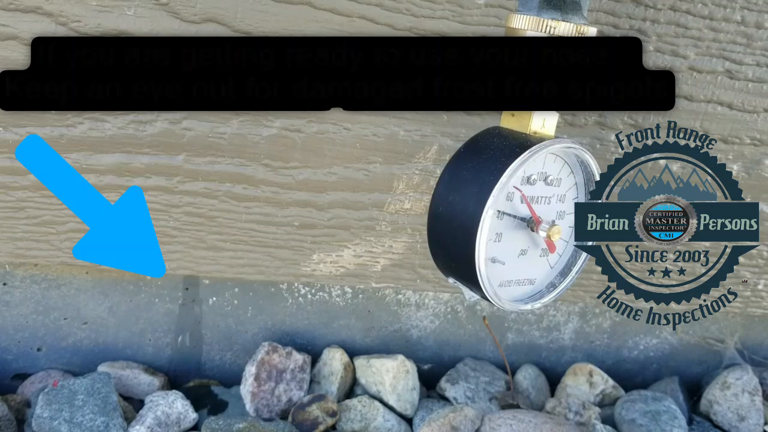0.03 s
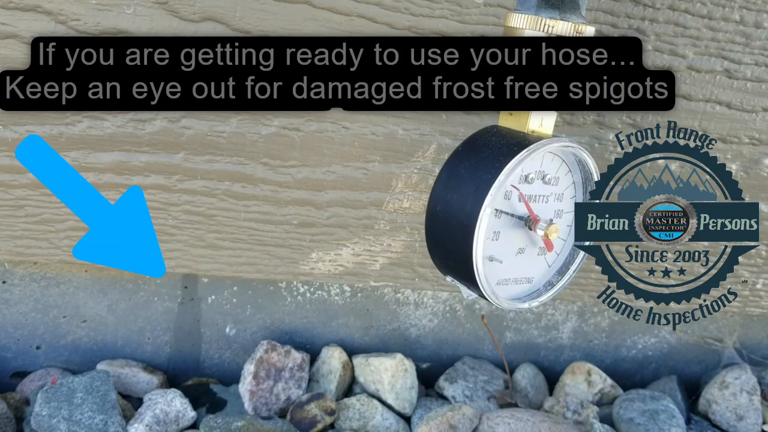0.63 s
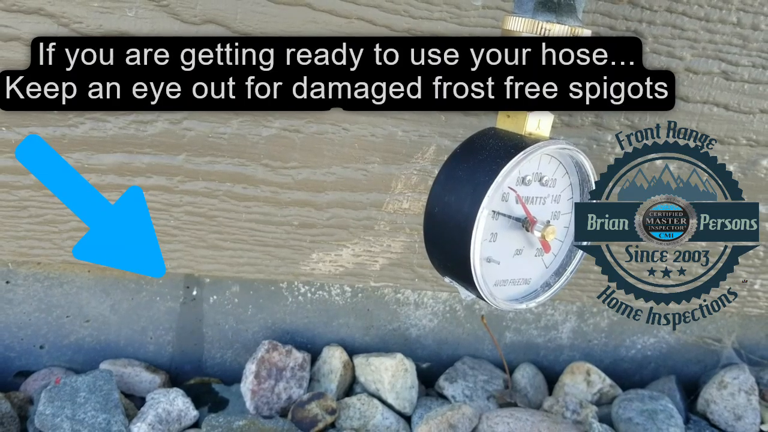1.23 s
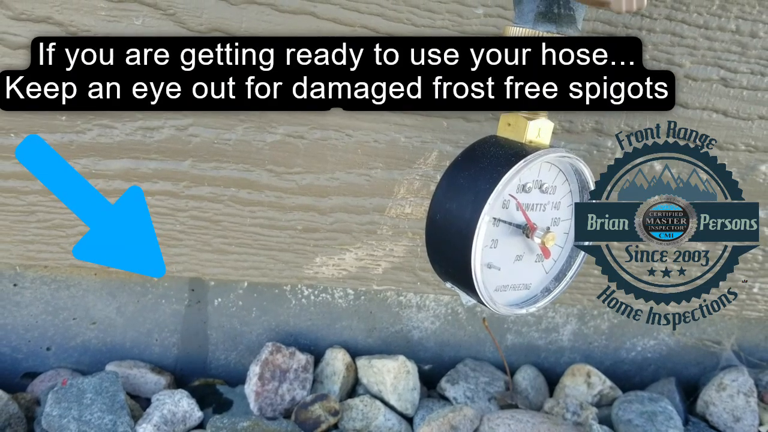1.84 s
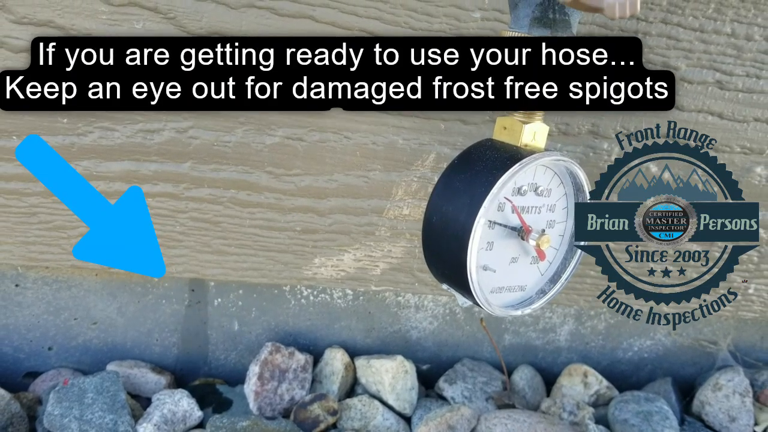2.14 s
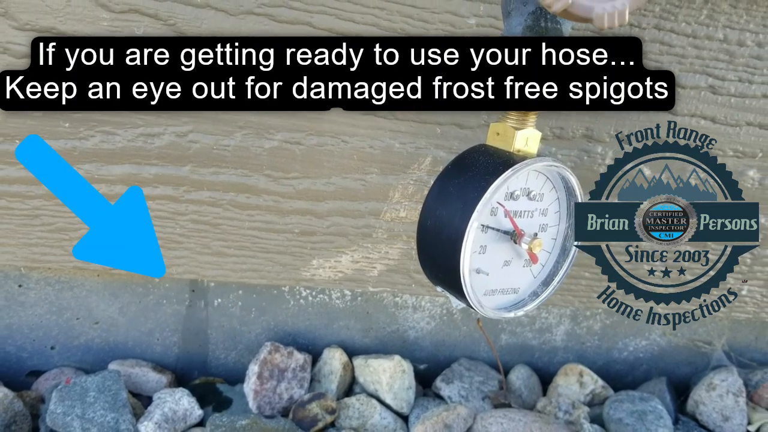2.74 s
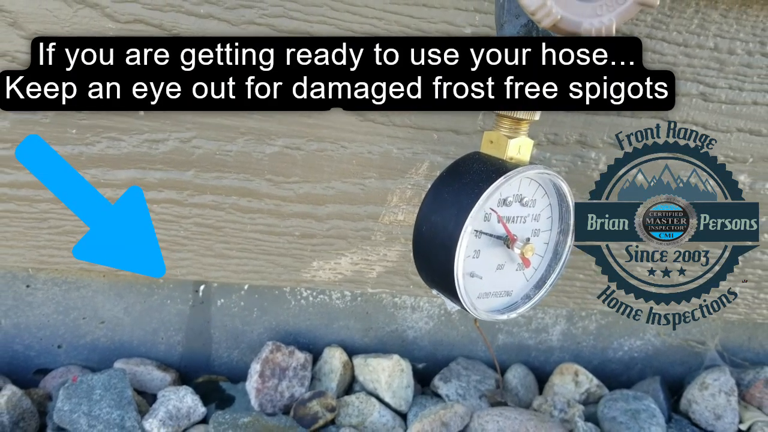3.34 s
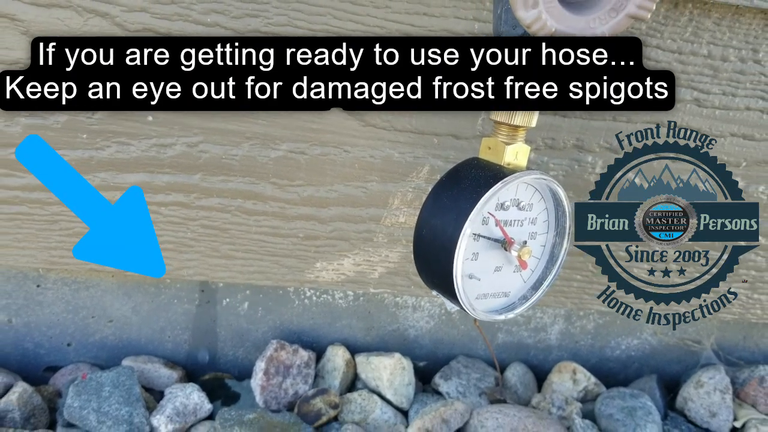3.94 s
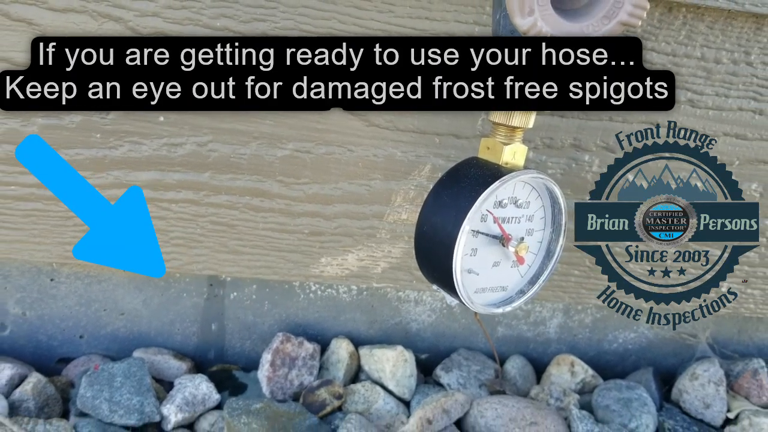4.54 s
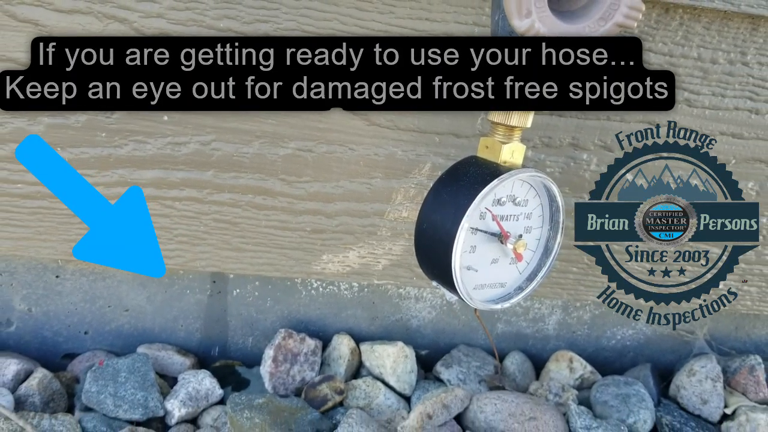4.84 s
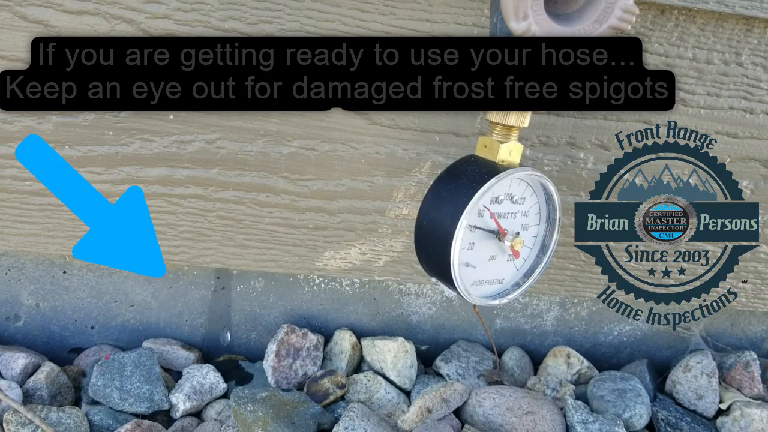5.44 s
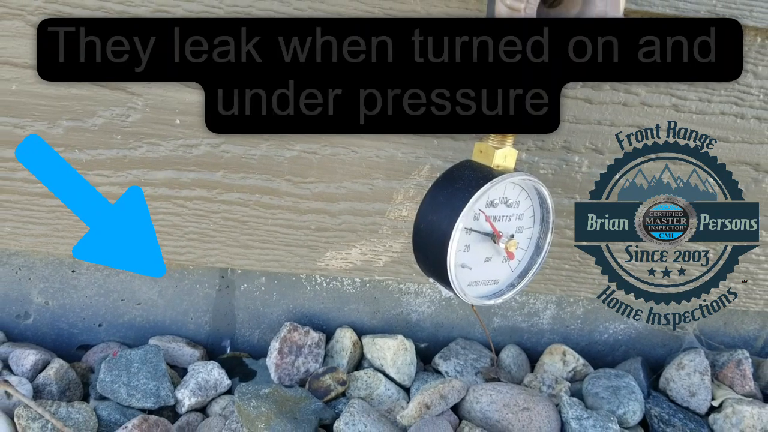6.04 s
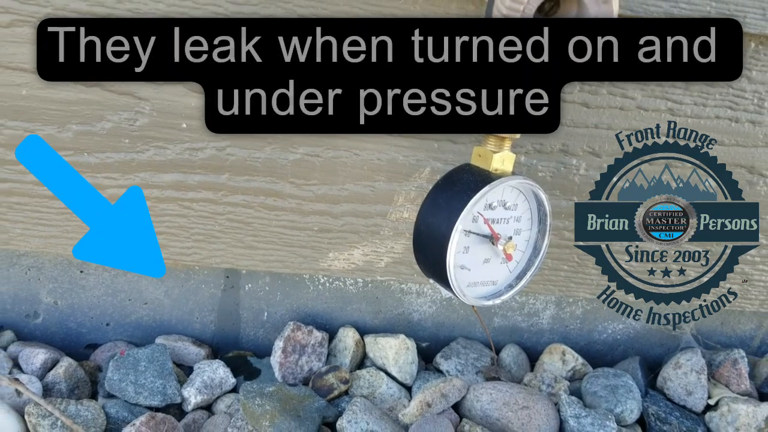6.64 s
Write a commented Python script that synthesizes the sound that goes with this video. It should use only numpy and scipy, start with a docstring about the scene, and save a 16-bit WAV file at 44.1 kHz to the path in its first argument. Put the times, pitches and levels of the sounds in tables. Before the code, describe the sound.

From about 0.2 seconds, pressurized water sprays from a cracked outdoor spigot close to the microphone. It makes a bright, fluttering hiss, leaning left, mixed with dense, fine spatter on a wall and stones. Underneath, water runs softly among pebbles and the pipe holds a faint hollow note. Tiny sharp spits dot the first second, with a spurt near 0.8 seconds. The flow chokes and spurts again around 1.3, dips briefly at 3, and surges near 4.7, 5.3, 5.5 and 6.5. After 4 seconds the hiss shifts slightly toward the middle and brightens a little. A light breeze rumbles on the microphone over a dull, distant neighbourhood rumble. A thin, very high whistle flutters with the gusts, strongest around 1 second, and the spray has a glassy, fizzy edge. The leak continues until the end, at about 6.7 seconds.

```python
"""Split spigot against a house wall

Outdoors, close to the leak: water under pressure tears out of the crack, hissing and fluttering on the left.
Droplets patter on the wall, water runs among the pebbles below and the pipe rings faintly. Air rumbles on
the microphone, with the neighbourhood far behind. The recorder's low, unsmoothed sample rate mirrors it
all into the treble, where the rumble becomes a fluttering whistle."""
import sys
import numpy as np
from scipy import signal
from scipy.fft import rfft, irfft
from scipy.io import wavfile
from scipy.ndimage import uniform_filter1d

SR = 44100
rng = np.random.default_rng(int(sys.argv[2]) if len(sys.argv) > 2 else 0)


def master_out(mix):
    """Clip the mix to full scale and print it as 16-bit PCM to the path in sys.argv[1]."""
    frames = np.transpose(np.atleast_2d(mix))
    ceiling = np.clip(frames, -1, 1)
    pcm = np.round(ceiling * 32767).astype(np.int16)
    wavfile.write(sys.argv[1], SR, pcm)


N = 294588
TIME = np.arange(N) / SR
FREQS = np.maximum(np.arange(N // 2 + 1) * SR / N, 1)
LEFT_MINUS_RIGHT = np.array([[1], [-1]])


# where the jet points, seen from the microphone: (time [s], relative lean to the left [dB])
JET_AIM = [(0.2, 8), (3.7, 8), (3.87, 7.5), (4.7, 5), (5.0, 4.5), (5.55, 4), (5.73, 6.2), (6.0, 5),
           (6.68, 5.5)]
# short sharp spits, in the jet alone: (time [s], lift [dB])
JET_SPITS = [(.19, 4), (.255, 6), (.298, 3), (.352, 4), (.398, 4), (.505, 6), (.637, 6), (2.012, 6),
             (3.30, 7.5), (3.56, 4), (3.69, 4.5), (3.795, 4), (5.136, 2.5)]
# resonances of the crack: (frequency [Hz], width [Hz], left [dB], right [dB])
CRACK_MODES = [(4040, 77, -4, -33), (4195, 33, 4, -10.5), (4400, 134, -18.5, -10), (4566, 34, -0.5, -12.5),
               (4715, 64, 1.5, -17.5), (4880, 30, -31, -36)]

def jet(flow_db, turn_db, gain_db=-54.0, pan_offset_db=-7.5, spit_half_s=0.0051):
    """Close by, a sheet of water tears up at the crack; the hiss weakens and brightens as it turns."""
    spits_db = sum(lift * bump(at, spit_half_s) for at, lift in JET_SPITS)
    strength_db = 0.7 * flow_db + spits_db - 0.19 * turn_db
    flutter_db = 0.24 * drift(12) + 0.85 * drift(70)
    tearing = droplets(per_s=3400, size_spread_db=1.0, mist_db=2.0) * from_db(strength_db + flutter_db)
    hiss = resonate(tearing, CRACK_MODES, tilt_db=0.94 * turn_db, wander_db=1.8)
    pan_db = in_time(JET_AIM) + pan_offset_db
    return from_db(gain_db + pan_db / 2 * LEFT_MINUS_RIGHT) * sheet_waver(hiss)


def sheet_waver(hiss, pitch_share=0.005, rate_hz=1.49):
    """All the jet's pitches sway together as the sheet of water changes shape."""
    read_s = TIME + pitch_share / (2 * np.pi * rate_hz) * drift(rate_hz)
    return np.array([np.interp(read_s, TIME, channel) for channel in hiss])


# strength of the leak about its usual flow: (time [s], level [dB])
LEAK_FLOW = [(0.2, 1.8), (1.13, 0.4), (1.34, -3.5), (1.49, 3.5), (2.27, 1.8), (2.43, -0.4), (2.71, 3),
             (2.87, 0), (3.47, 0.5), (3.84, 3), (3.96, 0), (4.38, 1.7), (4.6, -1.2), (4.89, 2.5),
             (5.05, -0.5), (5.75, -1.7), (6.68, 0.5)]
# the crack spurts harder for a moment: (start [s], length [s], lift [dB])
LEAK_SPURTS = [(0.763, 0.044, 5.5), (1.279, 0.076, 7.5), (1.985, 0.096, 3.0), (3.094, 0.089, 3),
               (3.63, 0.04, 3), (4.713, 0.09, 3), (5.12, 0.02, 3.6), (5.312, 0.098, 5.5),
               (5.469, 0.12, 4.5), (5.812, 0.02, 2), (6.545, 0.076, 4)]
# the leak chokes briefly: (time [s], level change [dB], half length [s])
LEAK_CHOKES = [(1.24, -5, 0.016), (3.03, -3.8, 0.03)]

def leak_flow_db(attack_s=0.01, release_s=0.027):
    """The flow at the spigot swells and sinks, shakes all the time, and now and then spurts or chokes."""
    flow_db = in_time(LEAK_FLOW) + 0.5 * drift(16)
    for start, length, lift in LEAK_SPURTS:
        rise = (TIME - start) / attack_s
        fall = 1 - (TIME - start - length) / release_s
        flow_db += lift * np.clip(np.minimum(rise, fall), 0, 1)
    return flow_db + sum(change * bump(at, half_s) for at, change, half_s in LEAK_CHOKES)


# resonances of wall and stones under the spray: (frequency [Hz], width [Hz], left [dB], right [dB])
WALL_AND_STONE_MODES = [(1353, 160, -8, -12), (1608, 28, -8.5, -6.5), (1751, 36, -2, -4.5),
                        (1908, 230, -8, -7.5), (2190, 17, -9, -4.5), (2459, 21, -6, 1),
                        (2568, 19, -1.5, -3.5), (2777, 133, -3.5, -2), (3021, 45, -3.5, -12),
                        (3129, 33, -10, 1.5), (3386, 22, -6, -2.5), (3607, 67, -5.5, -5.5),
                        (3844, 130, -17, -4.5)]

def splash(flow_db, turn_db, gain_db=-54.0):
    """Droplets land in clumps on the wall and stones by the spigot, brighter as the jet turns inward."""
    clumps = from_db(1.18 * flow_db + 0.5 * drift(4.5) + drift(130))
    impacts = droplets(per_s=3000, size_spread_db=1.0, mist_db=-1.0) * clumps
    patter = resonate(impacts, WALL_AND_STONE_MODES, tilt_db=0.75 * turn_db, wander_db=1.95)
    return from_db(gain_db) * patter


# where the wall's echo meets the direct sound: (frequency [Hz], width [Hz], gain [dB])
WALL_ECHO_BANDS = [(1450, 63, 0.5), (2140, 70, -12), (2340, 34, -9), (3480, 70, -3.5)]

def wall_echo(spray):
    """At the microphone the echo off the wall cancels a few narrow bands and barely lifts one."""
    for hz, width, gain_db in WALL_ECHO_BANDS:
        band = signal.lfilter(*signal.iirpeak(hz, hz / width, fs=SR), spray)
        spray = spray + (from_db(gain_db) - 1) * band
    return spray


# water running on the ground below the spigot: (time [s], relative level [dB])
PEBBLE_LEVEL = [(0.2, -57), (1.1, -57), (1.6, -55.5), (2.7, -58), (4.2, -58.5), (5.7, -59), (6.4, -56),
                (6.68, -56.5)]
# hollows between the pebbles: (frequency [Hz], width [Hz], left [dB], right [dB])
PEBBLE_MODES = [(365, 106, -9.5, -15), (554, 108, -5, 1), (688, 33, 3.1, 0), (835, 140, -7, -6.5),
                (1027, 110, -19, -27)]

def pebble_rush(gain_db=-1.5):
    """At the foot of the wall, water pours among the pebbles, lower and steadier than the splash."""
    trickle = droplets(per_s=2500, size_spread_db=2.5, mist_db=-2.5) * from_db(1.54 * drift(18))
    return from_db(in_time(PEBBLE_LEVEL) + gain_db) * resonate(trickle, PEBBLE_MODES)


# the pipe's note at the usual flow: (time [s], relative level [dB])
PIPE_LEVEL = [(0.2, -60.5), (1.6, -56.5), (2.4, -60), (3.7, -56.5), (4.0, -59), (4.25, -57), (5.4, -55),
              (5.85, -57), (6.68, -59.5)]
# resonance of the pipe: (frequency [Hz], width [Hz], left [dB], right [dB])
PIPE_RESONANCE = [(1227.3, 27, -3.5, -2)]

def pipe_ring(flow_db, gain_db=-2.3):
    """Behind the crack, turbulence inside the spigot keeps one hollow note ringing."""
    level_db = in_time(PIPE_LEVEL) + gain_db + 0.62 * flow_db + 0.8 * drift(5.1)
    turbulence = microphone_pair(rng.standard_normal((2, N)))
    return from_db(level_db) * resonate(turbulence, PIPE_RESONANCE)


# gusts at the microphone: (time [s], relative level [dB])
BREEZE_LEVEL = [(0.2, -65), (0.36, -50.5), (0.72, -55), (0.98, -43.5), (1.2, -60.5), (1.45, -52),
                (3.0, -54), (3.2, -47.8), (3.45, -56.5), (4.35, -56.5), (4.54, -48.5), (4.68, -60.5),
                (4.92, -49), (5.6, -56), (5.75, -53), (6.68, -53)]
# spectrum of the air moving over it: (frequency [Hz], relative level [dB])
BREEZE_SPECTRUM = [(5, -29), (12, -9), (19, 2.5), (28, -5.5), (43, -18), (74, -26), (150, -43), (400, -70)]

def breeze(gain_db=-1.7, evenness=0.86):
    """Air rocks the microphone itself some twenty times a second; gusts set its strength."""
    sway = coloured_noise(BREEZE_SPECTRUM)
    local_power = uniform_filter1d(np.mean(sway ** 2, axis=0), size=SR // 12) + 1e-6
    even_sway = sway / local_power ** (evenness / 2)
    return from_db(in_time(BREEZE_LEVEL) + gain_db) * even_sway


# the neighbourhood in the distance: (time [s], relative level [dB])
RUMBLE_LEVEL = [(0.2, -63.2), (0.8, -71.5), (1.0, -64), (1.9, -59.5), (2.8, -67), (3.1, -64.5),
                (3.8, -65.5), (5.1, -63), (5.6, -66.5), (6.5, -62)]
# spectrum of its rumble: (frequency [Hz], relative level [dB])
RUMBLE_SPECTRUM = [(25, -16.5), (50, -1), (74, 1), (95, -9.5), (120, -6), (148, -1.5), (195, -31.5),
                   (300, -19.5), (600, -46)]

def far_rumble(gain_db=-1.0):
    """The neighbourhood reaches the microphone from far off as a dull rumble."""
    return from_db(in_time(RUMBLE_LEVEL) + gain_db) * coloured_noise(RUMBLE_SPECTRUM)


# between the two microphone ports: (frequency [Hz], coherence [0-1], phase lead of the left [rad])
MICROPHONE_PORTS = [(30.4, 0.97, -0.06), (156, 0.66, -1.24), (295, 0.3, -0.5), (574, 0.43, -0.85),
                    (704, 0.48, 0.1), (880, 0.35, 2), (1210, 0.59, 4.0), (1600, 0.26, 2.5), (2300, 0.08, 4),
                    (3040, 0.17, 3), (3750, 0, 5), (4226, 0.4, 7.5), (4580, 0, 10), (4860, 0.32, 10)]

def microphone_pair(unrelated):
    """Two unrelated signals become left and right; paths along the wall turn the phase between them."""
    coherence, lead = over_hz(MICROPHONE_PORTS)
    mid, side = rfft(unrelated)
    channels = np.sqrt(1 + coherence) * mid + np.sqrt(1 - coherence) * side * LEFT_MINUS_RIGHT
    return irfft(channels * np.exp(0.5j * lead * LEFT_MINUS_RIGHT), N)


def droplets(per_s, size_spread_db, mist_db):
    """Random impacts, many small and a few large, over the smooth hiss of fine mist."""
    sizes = from_db(size_spread_db * np.minimum(rng.exponential(1, (2, N)), 5))
    lands = rng.random((2, N)) < per_s / SR
    hits = lands * sizes * rng.choice([-1, 1], (2, N))
    mist = from_db(mist_db) * rng.standard_normal((2, N))
    return microphone_pair(rms_one(hits) + mist)


def resonate(drive, modes, tilt_db=0, wander_db=0, narrowest_hz=36):
    """Parallel resonances, each wandering in strength; tilt lifts the upper against the lower. Rms 1."""
    ringing = np.zeros((2, N))
    middle_hz = np.mean(np.array(modes)[:, 0])
    lift = from_db(tilt_db / 2)
    for hz, width, left_db, right_db in modes:
        radius = np.exp(-np.pi * max(width, narrowest_hz) / SR)
        feedback = [1, -2 * radius * np.cos(2 * np.pi * hz / SR), radius ** 2]
        ring = (1 - radius ** 2) / 2 * signal.lfilter([1, 0, -1], feedback, drive)
        strength = from_db(wander_db * wander(turns_per_s=7))
        tilt = lift if hz > middle_hz else 1 / lift
        ringing += from_db([[left_db], [right_db]]) * ring * strength * tilt
    return rms_one(ringing)


def coloured_noise(spectrum):
    """Noise with this spectrum at the microphone pair; rms 1."""
    white = microphone_pair(rng.standard_normal((2, N)))
    return rms_one(irfft(rfft(white) * from_db(over_hz(spectrum)[0]), N))


def drift(rate_hz):
    """Smooth random motion, mostly slower than this rate; rms 1."""
    return rms_one(irfft(rfft(rng.standard_normal(N)) / (1 + (FREQS / rate_hz) ** 2), N))


def wander(turns_per_s):
    """Random values of spread 1, joined by straight lines."""
    knots = rng.standard_normal(200)
    return np.interp(TIME * turns_per_s, np.arange(len(knots)), knots)


def bump(at_s, half_s):
    """A bell curve in time, of height 1."""
    return np.exp(-((TIME - at_s) / half_s) ** 2)


def in_time(curve):
    """A (time, value) curve at every sample."""
    return np.interp(TIME, *np.transpose(curve))


def over_hz(points):
    """The columns of a table at every frequency, on a log axis."""
    hz, *columns = np.transpose(points)
    return [np.interp(np.log(FREQS), np.log(hz), column) for column in columns]


def from_db(db):
    """Decibels to gain."""
    return 10 ** (np.asarray(db) / 20)


def rms_one(x):
    """Scale to an rms of 1."""
    return x / np.sqrt(np.mean(x ** 2) + 1e-20)


def scene():
    """Up close, one unsteady flow drives splash, jet and pipe; breeze and far rumble lie underneath."""
    flow_db = leak_flow_db()
    aim_db = in_time(JET_AIM)
    turn_db = aim_db.mean() - aim_db  # positive as the jet turns from the left towards the middle
    spray = splash(flow_db, turn_db) + jet(flow_db, turn_db)
    return wall_echo(spray) + pebble_rush() + pipe_ring(flow_db) + breeze() + far_rumble()


def steep_low_pass(x, edge_hz):
    """The recorder's very steep elliptic filter."""
    return signal.sosfilt(signal.ellip(14, 0.2, 70, edge_hz, fs=SR, output="sos"), x)


def record(dry, start_s=0.166, fade_s=0.005, sample_step=4):
    """The recorder starts and keeps every fourth sample unsmoothed, which mirrors the band upward."""
    running = np.clip((TIME - start_s) / fade_s, 0, 1) ** 2
    band = steep_low_pass(dry * running, edge_hz=5020)
    mirrored = band * sample_step * (np.arange(N) % sample_step == 0)
    return steep_low_pass(mirrored, edge_hz=15750)


dry = scene()
out = record(dry)
master_out(out)
```